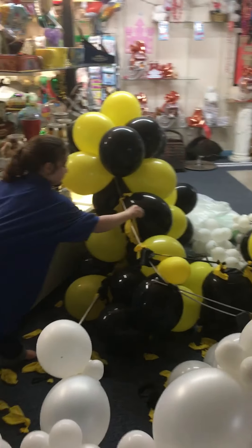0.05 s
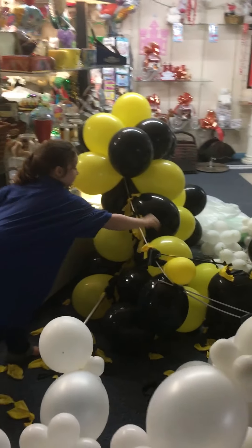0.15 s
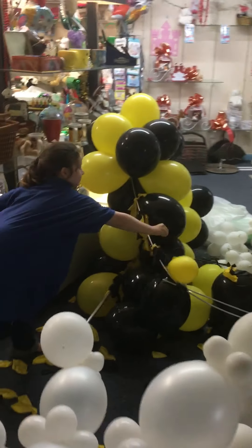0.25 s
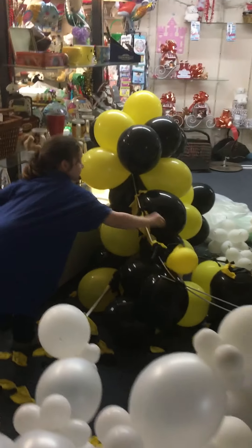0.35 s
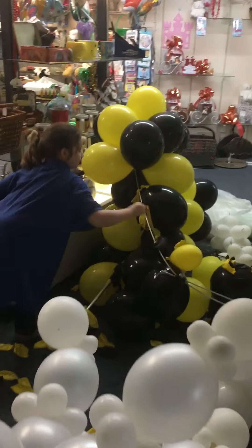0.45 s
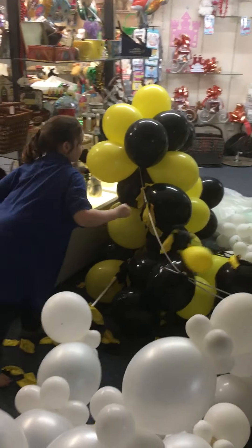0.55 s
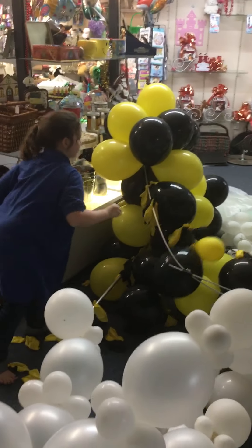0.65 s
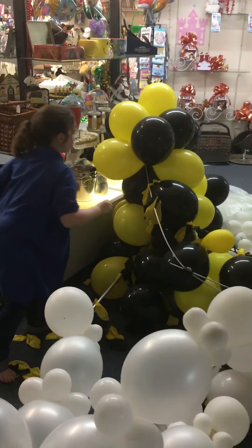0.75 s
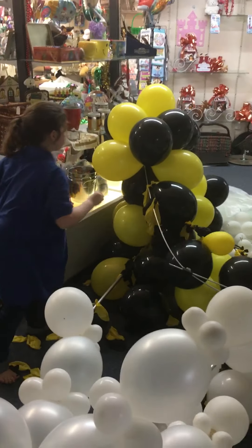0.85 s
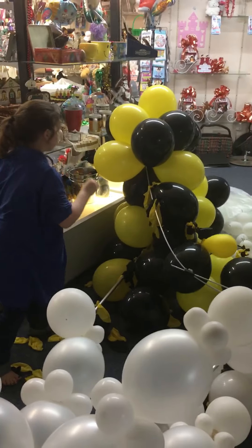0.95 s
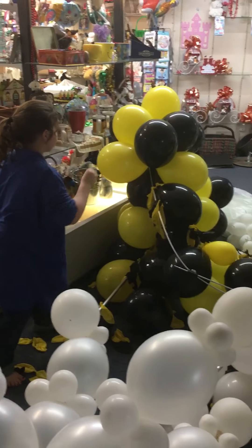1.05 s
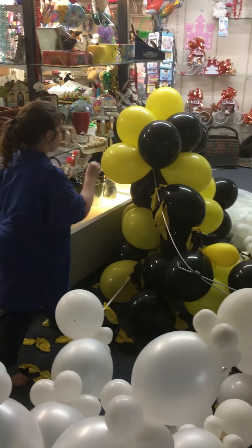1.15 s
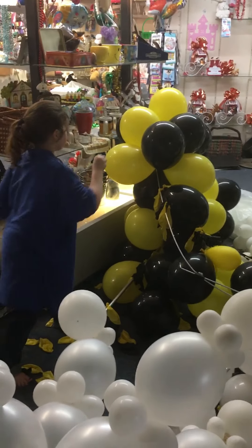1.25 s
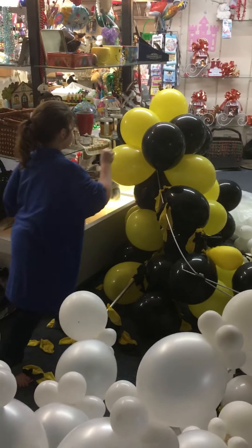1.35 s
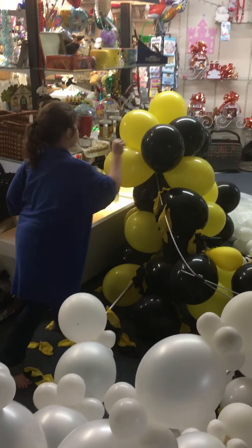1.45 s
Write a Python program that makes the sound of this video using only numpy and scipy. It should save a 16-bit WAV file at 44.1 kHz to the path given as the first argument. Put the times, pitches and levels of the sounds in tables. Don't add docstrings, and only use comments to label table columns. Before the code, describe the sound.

A balloon pop in a small, crammed shop. Very quiet low hum, faint rubber rustle and a small tick at 0.15 s; at 0.22 s a pin tick and brief hiss, then at 0.25 s a loud sharp crack with a hollow low-mid boom from neighbouring balloons, dying within about 0.3 s. From 0.5 to 1.5 s, soft rustles, dry ticks until 0.83 s and faint wavering low rubbing tones over hum.

```python
import sys
import numpy as np
from scipy import signal
from scipy.fft import rfft, irfft
from scipy.io import wavfile

SR = 44100
rng = np.random.default_rng(int(sys.argv[2]) if len(sys.argv) > 2 else 0)


def voltage_ratio(level):
    return 10 ** (np.asarray(level, float) / 20)


def wrap_up_sound(samples):
    columns = np.atleast_2d(samples).T
    tamed = np.clip(columns, -1, 1)
    steps = np.round(tamed * 32767).astype(np.int16)
    wavfile.write(sys.argv[1], SR, steps)


N = 66150
TIME_S = np.arange(N) / SR
FREQ_HZ = np.arange(N // 2 + 1) * SR / N
BURST_S, TEAR_S = .2468, .0035


def rms_one(x):
    return x / np.sqrt(np.mean(x ** 2) + 1e-20)


def white():
    return rng.standard_normal(N)


def butter(x, order, hz, kind):
    return signal.sosfilt(signal.butter(order, hz, kind, fs=SR, output="sos"), x)


def at_hz(points, hz):
    point_hz, value = np.transpose(points)
    return np.interp(np.log(np.maximum(hz, 1)), np.log(point_hz), value)


def colour(x, spectrum, tilt_db=0):
    gain = rms_one(voltage_ratio(at_hz(spectrum, FREQ_HZ)))
    tilt = voltage_ratio(tilt_db * (FREQ_HZ > 5000))
    return irfft(rfft(x) * gain * tilt, N)


def swell(start_s, rise_s, t60_s):
    t = TIME_S - start_s
    rise = np.sin(np.pi / 2 * np.clip(t / max(rise_s, 1e-4), 0, 1)) ** 2
    return rise * voltage_ratio(-60 * np.maximum(t - rise_s, 0) / t60_s)


def puff(start_s, hz, t60_s):
    edges_hz = [hz * .7, min(hz * 1.16, 20000)]
    noise = rms_one(butter(white(), 2, edges_hz, "band"))
    return swell(start_s, min(TEAR_S, t60_s / 20), t60_s) * noise


def sine(hz):
    return np.sqrt(2) * np.sin(2 * np.pi * np.cumsum(hz) / SR)


def shop():
    # hz, level_db_per_hz
    air_spectrum = [(150, -8.5), (245, -6), (450, -17.5), (1900, -21), (4400, -33.5), (7500, -36.5),
                    (10500, -31.5), (16000, -44.5)]
    # hz, level_db_per_hz
    rumble_spectrum = [(25, -10), (45, -6.5), (72, -1), (95, -4.5), (120, -1), (170, -4.5), (260, -15)]
    # time_s, level_db
    throb_levels = [(0, -60), (0.042, -65), (.09, -61), (.16, -80), (0.311, -54), (.41, -50.5), (.445, -65),
                    (0.502, -58.5), (.6, -58), (.66, -63), (.7, -54), (.74, -53.5), (.775, -71),
                    (0.832, -58), (.94, -62), (1.19, -60.5), (1.4, -61.5), (1.5, -56)]
    air_db, steady_db, rumble_db, hum_db = -67.5, -66.5, -2, -4.5
    hum_hz, wander_hz = 73, 4

    s, db = np.transpose(throb_levels)
    throb = voltage_ratio(np.interp(TIME_S, s, db))
    low = rms_one(butter(colour(white(), rumble_spectrum), 4, 400, "low"))
    wander = np.interp(np.arange(N) / N, np.linspace(0, 1, 20), rng.standard_normal(20))
    hum = sine(hum_hz + wander_hz * wander)
    air = butter(colour(white(), air_spectrum), 2, 180, "high")
    steady = voltage_ratio(steady_db) * low[::-1]
    throbbing = throb * (voltage_ratio(rumble_db) * low + voltage_ratio(hum_db) * hum)
    return steady + throbbing + voltage_ratio(air_db) * air


def drone(contour):
    s, hz, db = np.transpose(contour)
    fade = np.clip(np.minimum(TIME_S - s[0], s[-1] - TIME_S) / 0.0089, 0, 1)
    return fade * voltage_ratio(np.interp(TIME_S, s, db)) * sine(np.interp(TIME_S, s, hz))


def drones():
    # time_s, pitch_hz, level_db
    early = [(0.0, 164, -49.5), (0.036, 166, -77), (0.072, 136, -84), (0.126, 139.4, -57.5),
             (0.15, 140, -75)]
    # time_s, pitch_hz, level_db
    middle = [(.5, 108, -80), (.55, 101.1, -57), (.61, 101.5, -55), (.66, 112.4, -69.5), (.72, 117, -59),
              (.76, 117.6, -67), (.83, 114, -61)]
    # time_s, pitch_hz, level_db
    high = [(.85, 156.1, -64.5), (.9, 169.3, -52.5), (.945, 167.1, -56.5), (.975, 168.2, -73),
            (1.01, 170.6, -54), (1.09, 156.4, -58), (1.12, 155.3, -62.5), (1.16, 160, -55.5),
            (1.24, 149, -68)]
    # time_s, pitch_hz, level_db
    late_low = [(1.2, 129.2, -58), (1.25, 116, -61), (1.33, 118.3, -61), (1.37, 115.5, -81),
                (1.48, 124, -62.5)]
    return drone(early) + drone(middle) + drone(high) + drone(late_low)


def rustle():
    # start_s, level_db, rise_s, t60_s, brightness_db
    brushes = [(0, -62.5, 0.003, 0.067, 6), (.14, -73.5, 0.013, 0.98, 9.5), (0.483, -60, 0.023, 0.54, 6),
               (0.604, -60.5, 0.0022, 0.22, -4), (0.641, -63.5, 0.023, 0.71, 2.5),
               (.78, -67, 0.019, 0.15, 2), (0.811, -62, 0.018, 0.56, 1), (.89, -76, 0.044, 0.082, 6),
               (1.019, -72, 0.047, 0.34, 12.5), (1.10, -73, 0.028, 0.14, 9), (1.24, -70, 0.0047, 0.34, 4.5),
               (1.391, -65, 0.0015, 0.052, -16)]
    # hz, level_db_per_hz
    skin_spectrum = [(150, -20.5), (250, -4.5), (550, 1), (1650, -7.5), (3600, -19.5), (4400, -33),
                     (10000, -23.5), (16000, -38)]
    grains_per_s, spread_db = 15000, 2.5

    grain_gain = voltage_ratio(spread_db * np.minimum(rng.exponential(1, N), 4))
    hits = rng.random(N) < grains_per_s / SR
    grains = rms_one(grain_gain * white() * hits) + white()
    out = np.zeros(N)
    for start_s, db, rise_s, t60_s, tilt_db in brushes:
        brush = colour(grains, skin_spectrum, tilt_db)
        out += voltage_ratio(db - 2.5) * swell(start_s, rise_s, t60_s) * brush
    return out


def ticks():
    # start_s, level_db, centre_hz
    landings = [
        (0.145, -62, 2180),
        (.608, -68, 8500),
        (0.619, -60, 13000),
        (0.664, -53, 885),
        (0.827, -55, 1690),
    ]
    return sum(voltage_ratio(db) * puff(start_s, hz, 0.0085) for start_s, db, hz in landings)


def prick():
    # hz, level_db_per_hz
    leak_spectrum = [(150, -6.5), (1200, -9), (3600, -14), (4500, -31), (5500, -22.5), (6900, -29),
                     (9500, -13.5), (16000, -24)]
    prick_s, tick_db, leak_db = .2238, -34, -38.5

    tick = swell(prick_s, 0.00021, .008) * colour(white(), leak_spectrum, 2.4)
    until_torn = TIME_S < BURST_S + TEAR_S
    leak = swell(prick_s, .0005, .2) * until_torn * colour(white(), leak_spectrum)
    return voltage_ratio(tick_db) * tick + voltage_ratio(leak_db) * leak


def air_pulses():
    # delay_s, level_db, length_s
    pulses = [
        (-.0005, -19, .0014),
        (.0018, -11, .0016),
        (.0036, -12.5, .0011),
        (.0058, -11.5, .0011),
        (.0092, -12, .0011),
        (0.0133, -13.5, .0012),
    ]
    out = np.zeros(N)
    for delay_s, db, length_s in pulses:
        phase = np.clip((TIME_S - BURST_S - delay_s) / length_s, 0, 1)
        out -= voltage_ratio(db) * np.sin(2 * np.pi * phase)
    return out


def ring(x, hz, t60_s):
    r, w = voltage_ratio(-60 / (t60_s * SR)), 2 * np.pi * hz / SR
    return signal.lfilter([0, np.sin(w)], [1, -2 * r * np.cos(w), r * r], x + 1e-18)


def balloon_pile():
    # hz, level_db, t60_s
    air_modes = [(102, -20.5, 0.2), (152.6, -14.5, 0.29), (178, -10, 0.16), (209.3, -7, 0.18),
                 (252.5, -5.5, 0.15), (318.8, -12.5, 0.26), (370.6, -11.5, 0.17), (410.4, -15.5, 0.29),
                 (450, -22, 0.33), (618, -23.5, 0.16), (827, -21, 0.11), (1033, -17.5, 0.1),
                 (1163, -11.5, .1), (1776, -21.5, .1)]
    shock_s, pile_db = .0030, -5.5

    click = np.zeros(N)
    click[int((BURST_S + shock_s) * SR)] = 1
    return sum(voltage_ratio(db + pile_db) * ring(click, hz, t60_s) for hz, db, t60_s in air_modes)


def room_bang():
    # hz, level_db_per_hz
    bang_spectrum = [(60, -20.5), (256, -1), (680, -16), (2400, -17.5), (4300, -33.5), (5700, -33),
                     (9500, -26.5), (16000, -35.5)]
    # hz, t60_s
    room_t60 = [(80, .28), (180, .26), (350, .25), (1000, 0.27), (3000, 0.21), (5700, .25), (8000, .2),
                (16000, 0.24)]
    bang_db, late_db, late_top_db, late_t60_s = -14.5, -57, -7, 1.4

    noise = rfft(colour(white(), bang_spectrum))
    octave = np.log2(FREQ_HZ + SR / N)
    out = np.zeros(N)
    for centre in np.arange(5, 15, .5):
        band = irfft(noise * np.clip(1 - 2 * abs(octave - centre), 0, 1), N)
        early = voltage_ratio(bang_db) * swell(BURST_S, TEAR_S, at_hz(room_t60, 2. ** centre))
        late = voltage_ratio(late_db + late_top_db * (centre > 11.5)) * swell(BURST_S, 0.039, late_t60_s)
        out += band * (early + late)
    return out


def rubber_crack():
    crack = voltage_ratio(-18) * puff(BURST_S, 1720, 0.082)
    snap = voltage_ratio(-23) * puff(BURST_S + 0.0026, 10000, 0.061)
    return crack + snap


def burst():
    return butter(air_pulses() + balloon_pile() + room_bang() + rubber_crack(), 3, 79, "high")


def scene():
    return (shop() + drones() + rustle() + ticks() + prick() + burst())[None]


def top_cut(x):
    return signal.sosfilt(signal.butter(12, 16830, fs=SR, output="sos"), x)


def record(dry):
    x = butter(dry, 2, 45, "high")
    x = 1.5 * np.tanh(x / 1.5)
    x = signal.sosfilt(signal.ellip(10, .5, 35, 15700, fs=SR, output="sos"), x)
    return top_cut(x)


dry = scene()
out = record(dry)
wrap_up_sound(out)
```